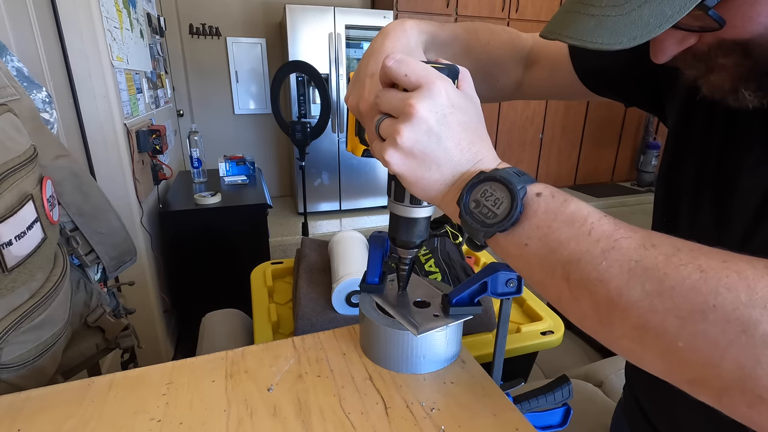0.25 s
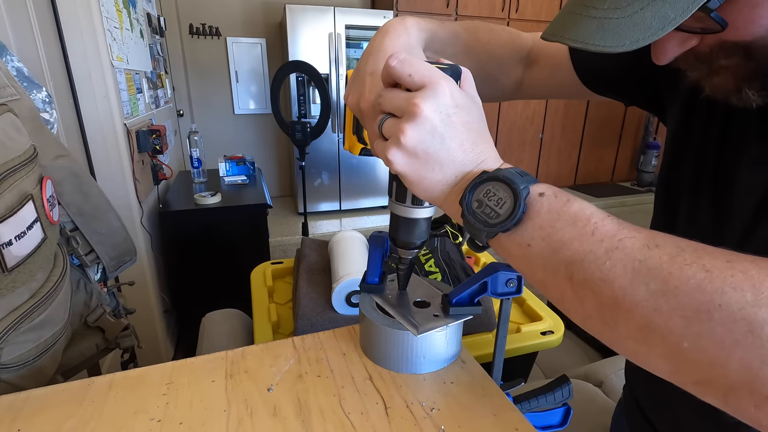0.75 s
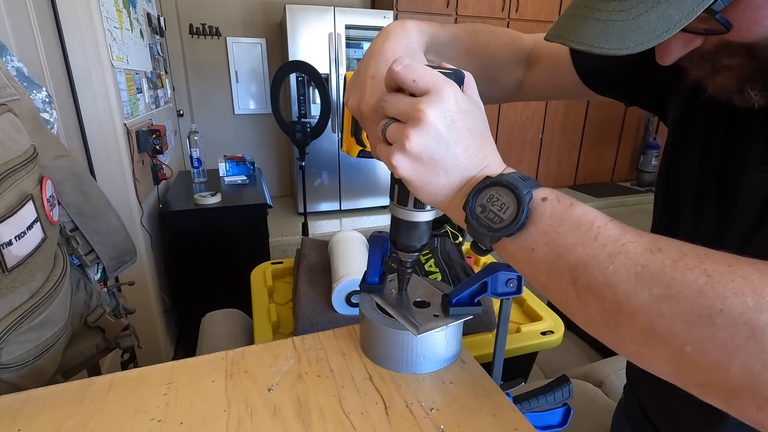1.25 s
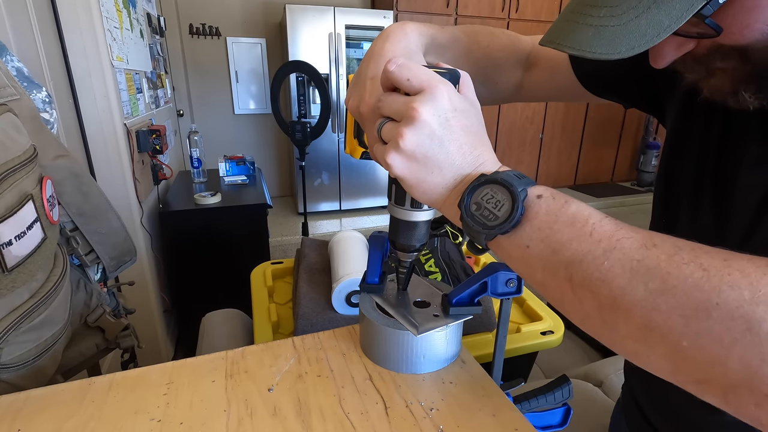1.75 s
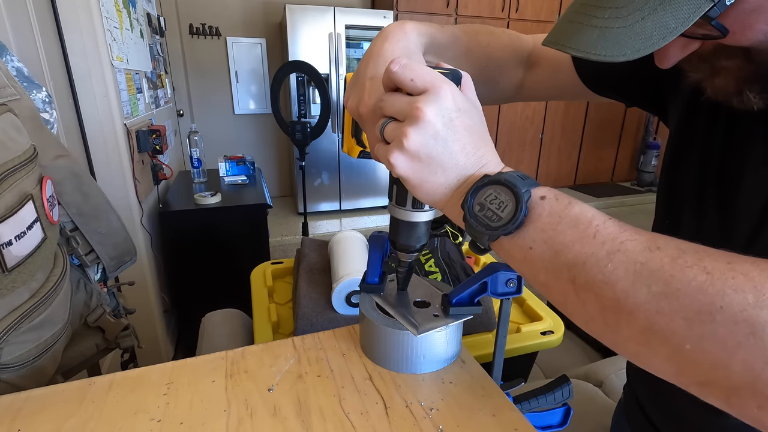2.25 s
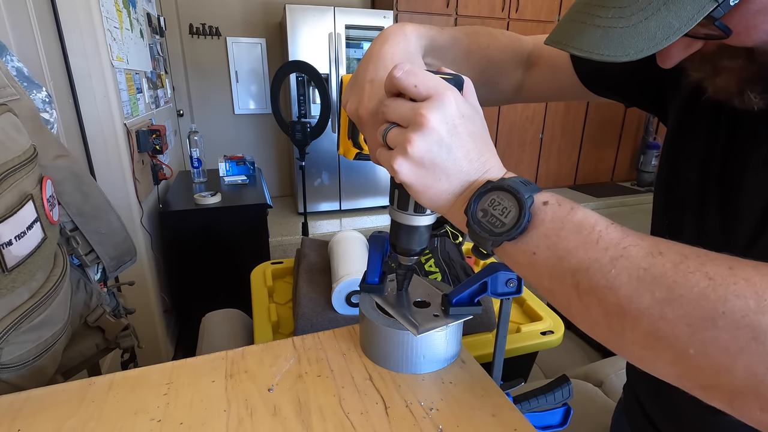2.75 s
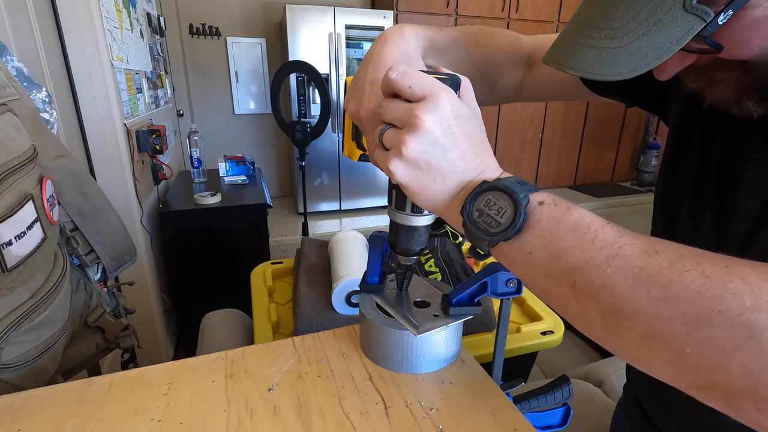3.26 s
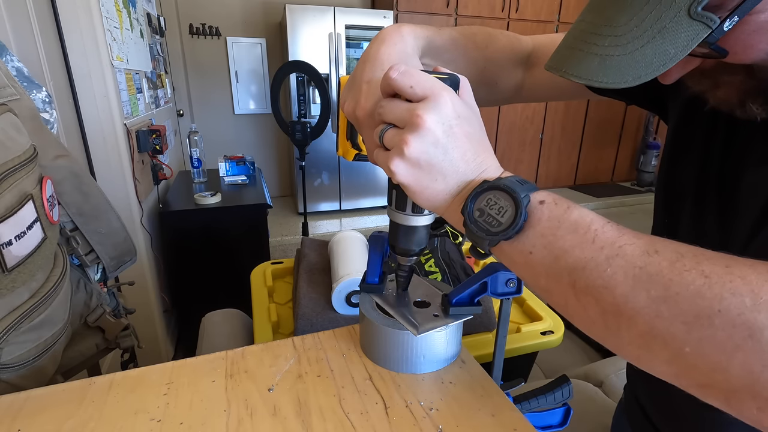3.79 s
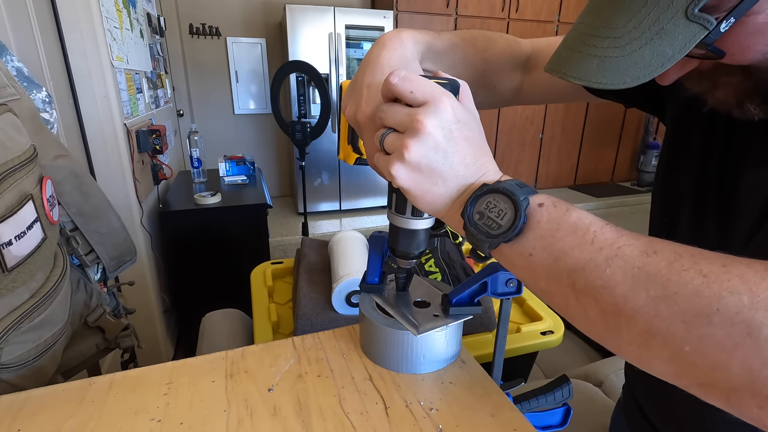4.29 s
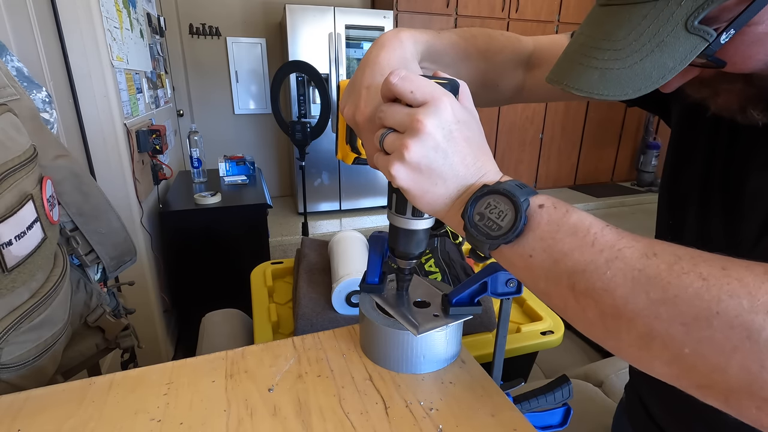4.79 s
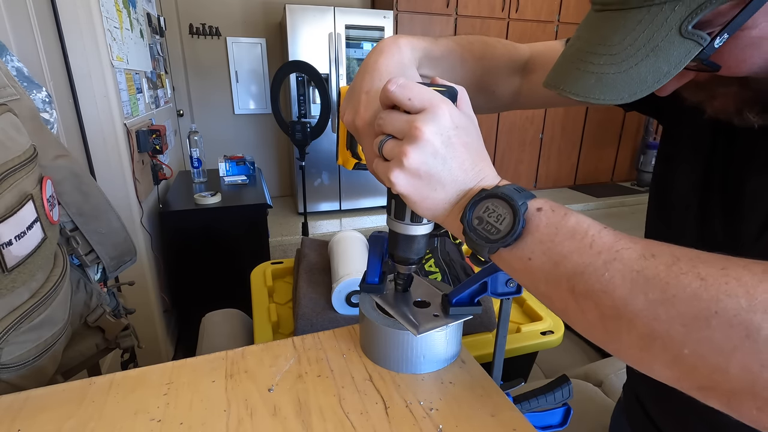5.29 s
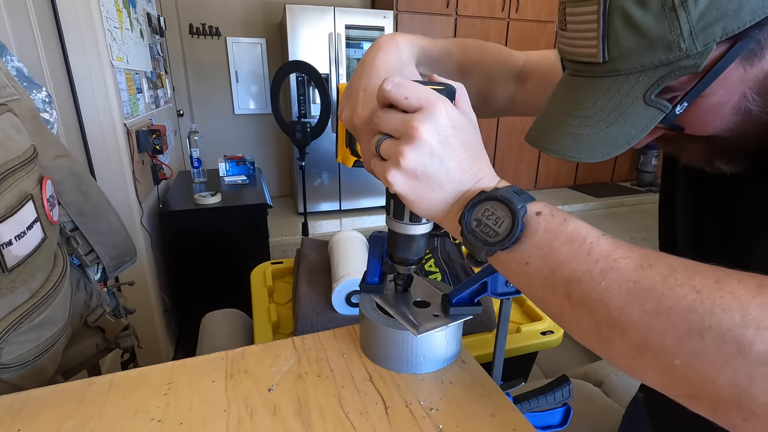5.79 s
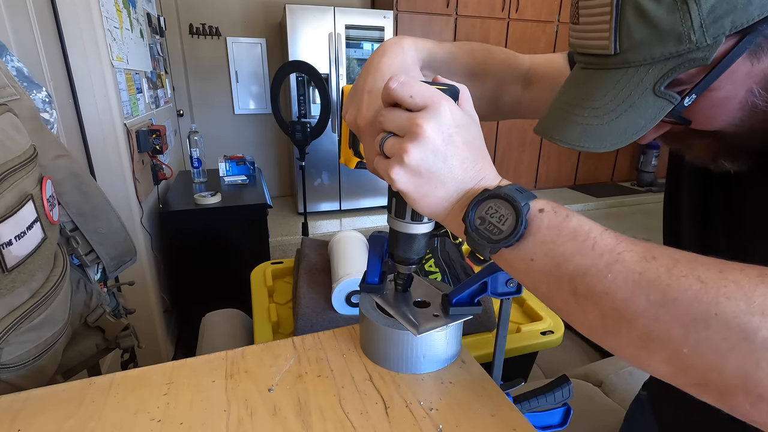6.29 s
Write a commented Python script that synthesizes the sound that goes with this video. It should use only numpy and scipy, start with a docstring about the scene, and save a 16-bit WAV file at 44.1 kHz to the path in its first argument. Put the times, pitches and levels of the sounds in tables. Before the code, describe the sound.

Close up in a workshop, a cordless drill bores a clamped steel plate in six bursts. The first is already under way and stops almost at once; four more follow, each juddering up from slow chatter to a rasping growl with hiss, small squeaks and sharp metal snaps. Each cuts off quickly, leaving a short room ring, faint ticks and a low motor hum. The last is still running at the end.

```python
"""A cordless drill pushes a step bit through a clamped steel plate in six bursts, close by in a workshop.
Stick-slip chatter that quickens with speed drives three layers: bench rumble, plate rasp and scraping hiss.
Sine chirps make the squeaks; dying noise cracks make the catches and ticks. The first burst is already
under way and the last still runs at the end; between them the room rings out over a humming appliance."""
import sys
import numpy as np
from scipy import signal
from scipy.fft import rfft, irfft, next_fast_len
from scipy.io import wavfile
from scipy.ndimage import uniform_filter1d

SR = 44100
rng = np.random.default_rng(int(sys.argv[2]) if len(sys.argv) > 2 else 0)


def int16_out(signal):
    """Quantize to a 16-bit WAV file."""
    q = np.round(np.clip(np.atleast_2d(signal).T, -1, 1) * 32767)
    wavfile.write(sys.argv[1], SR, q.astype(np.int16))


N = 288414
T = np.arange(N) / SR

# pulls of the trigger; the touch level is added to the three layers until the edge has sunk in:
# (on [s], off [s], creep before the squeeze [s], spin-up [s], top rate [slips/s], time to sink in [s],
#  first touch [dB], bench [dB], plate [dB], scrape [dB])
TRIGGER_PULLS = [(-.3, 0.147, 0, 0.11, 362, .05, -20, -22, -20, -27),
                 (.65, 1.493, .105, .25, 383, 0.16, -21.5, -21, -20, -27.5),
                 (2.037, 2.969, 0.0002, .29, 319, .065, -20.5, -22.5, -20.5, -27.5),
                 (3.561, 4.213, .015, .27, 355, 0.082, -34, -23, -20, -27),
                 (4.768, 5.233, 0.0026, .115, 380, 0.049, -11, -23.5, -20, -26),
                 (6.475, 6.67, 0.024, 0.39, 276, 0.071, -22.5, -21, -22, -32.5)]
# rate of the barely turning bit [slips/s]; slowing time constant once the trigger is let go [s]
CREEP_SLIPS_PER_S, BRAKE_S = 45, .03
# the bit stops biting and skates on the steel: (time [s], half length [s], depth [0-1])
SKATES = [(1.282, 0.056, .6), (2.732, 0.14, .85), (3.978, .075, 1.0), (5.024, 0.058, 0.74)]
SKATE_DRAG = .14  # share of the speed lost to rubbing at depth 1
# change of the three layers at skate depth 1 [dB]
SKATE_BENCH_DB, SKATE_PLATE_DB, SKATE_SCRAPE_DB = -7, -3.5, 0.5
# the bench shakes hardest at this chatter rate [slips/s], over this spread [octaves], with this lift [dB]
SHAKE_HZ, SHAKE_OCTAVES, SHAKE_DB = 135, 0.52, 4
SWING_DB = 4.5  # extra lift of the low swing while the bench shakes hardest
# the scrape grows with speed, with no change at this rate
FULL_SLIPS_PER_S, SCRAPE_DB_PER_OCTAVE = 400, 0.6
# spells in which the edges dig in evenly as the bit turns:
# (first bite [s], last bite [s], rate [bites/s], depth [dB])
THROBS = [(0.95, 1.107, 33, 5), (1.164, 1.3, 15.7, 1), (1.329, 1.5, 41.2, 6), (2.156, 2.297, 22.2, 3),
          (2.316, 2.486, 29.4, 5.5), (2.518, 2.765, 33, 6), (3.689, 3.945, 24.4, 3),
          (4.012, 4.2, 36.8, 3.5), (4.839, 5.02, 17.3, 3), (5.058, 5.22, 18, 3)]
# overtones of the slip rate: (multiple of the rate [1], relative level [dB])
GROWL_OVERTONES = [(2, -4), (3, -3), (4, -5.5)]

# an edge catches and snaps a chip: (time [s], relative strength [dB])
CATCHES = [(0.6544, -30.5), (0.6943, -18.5), (0.7312, -16.5), (0.7664, -11), (0.8364, -14.5),
           (1.0066, -7.5), (2.0562, -26.5), (2.0744, -8), (2.3174, -14.5), (2.8734, 1.5), (3.6012, -22),
           (3.6267, -7), (4.7935, -3), (4.8105, -5), (4.8774, -11), (5.2694, -18), (6.4837, -29.5),
           (6.5054, -31), (6.5304, -28)]
# loose chips and the slack chuck tick: (time [s], relative strength [dB])
TICKS = [(3.2964, -45.5), (3.4481, -55), (4.7503, -41), (5.4378, -36.5), (5.5485, -36), (5.6284, -50.5),
         (5.7224, -48.5), (6.3654, -58)]
# the dry edge squeaks on the steel: (time [s], length [s], pitch [Hz], relative level [dB])
SQUEAKS = [(1.212, 0.0084, 5460, -20), (1.232, 0.011, 5330, -28.5), (1.297, .008, 6100, -26.5),
           (1.323, 0.01, 5500, -19), (2.599, 0.0036, 5028, -16), (2.663, 0.013, 6640, -23),
           (2.716, 0.0087, 6220, -18.5), (2.747, .020, 5970, -21), (2.77, 0.012, 7950, -20),
           (2.787, 0.013, 7660, -21.5), (2.811, 0.013, 6690, -22.5), (3.926, 0.0075, 5330, -18.5),
           (3.95, 0.012, 6950, -14.5), (3.981, 0.012, 7000, -17.5), (4.017, 0.011, 5970, -16),
           (4.81, 0.0074, 5760, -30.5), (1.268, 0.052, 3450, -31.5), (1.381, 0.033, 4140, -26.5),
           (2.585, 0.04, 3500, -29), (2.655, 0.031, 3892, -28.5), (2.73, 0.014, 3700, -34),
           (2.917, 0.056, 3990, -27), (4.094, 0.044, 3604, -29), (5.209, 0.016, 4705, -27.5)]

# resonances of the bench: (frequency [Hz], width [Hz], lift [dB])
BENCH_MODES = [(171.5, 18, 11), (367.8, 24, 1)]
# resonances of the clamped plate: (frequency [Hz], width [Hz], lift [dB])
PLATE_MODES = [(588.6, 63, 6.6), (695, 30, 2.33), (746.5, 25, 12.6), (819, 20, 5), (910, 48, 3.3),
               (969, 52, 1), (1115, 25, 1.2), (2085, 41, 6), (2230, 35, 2.1), (3000, 160, 8.4)]
# resonances of the bit: (frequency [Hz], width [Hz], lift [dB])
BIT_MODES = [(3550, 110, 2.9), (3880, 81, 3), (4660, 290, 6.9), (6400, 56, 1.4), (6850, 130, 3.6),
             (10190, 900, 10.2)]
# broad colour of the bench rumble: (frequency [Hz], gain [dB])
BENCH_COLOUR = [(35, -21), (70, -2), (125, 0.5), (200, -2.5), (330, -4.5), (420, -4), (520, -9), (700, -52)]
# broad colour of the plate rasp: (frequency [Hz], gain [dB])
PLATE_COLOUR = [(300, -26), (500, -12), (620, -1.5), (900, 1.5), (1050, -1), (1250, -4), (1700, -4),
                (2300, -6), (2700, -13), (3600, -39)]
# broad colour of the scraping hiss: (frequency [Hz], gain [dB])
SCRAPE_COLOUR = [(2000, -31), (2800, 4.5), (3250, -2), (3600, 2), (5200, -2.5), (7500, -7), (8600, -15),
                 (10500, -12.5), (12000, -17), (14100, -19.5), (14800, -42.5)]
# broad colour of a tick: (frequency [Hz], gain [dB])
TICK_COLOUR = [(200, -20.5), (900, 2), (3000, 0), (7000, -3), (14000, -15.5)]

# decay of the workshop's tail: (frequency [Hz], t60 [s])
ROOM_DECAY = [(100, 0.93), (400, 0.49), (1500, 0.67), (4000, 0.36), (8000, 0.36), (14000, 0.16)]
# the strongest rings carry less into the centre of the tail: (frequency [Hz], width [Hz], lift [dB])
ROOM_DIPS = [(750, 140, -5.5), (2100, 87, -1), (4646, 440, -6)]
# gain on the side signal, for echoes and air: (frequency [Hz], gain [dB])
SIDE_COLOUR = [(30, -22), (80, -29.5), (200, -16), (700, -13.5), (1400, -8), (3000, -9.5), (9000, -11.5),
               (13000, -5)]
# partials of the appliance: (frequency [Hz], level before swell and waver [dB rms])
HUM_PARTIALS = [(118.4, -41), (236.9, -57.5), (425.3, -79.5), (1066, -84), (1244, -77), (1362, -77),
                (1480, -79), (1599, -84.5)]
# swell of the whole hum: (time [s], lift [dB])
HUM_SWELL = [(0, 2), (3.3, 3.5), (5.5, 1.5), (5.85, 4.5), (6.15, 6.5), (6.5, 9.5)]
# colour of the low room rumble: (frequency [Hz], gain [dB])
AIR_COLOUR = [(8, -6.5), (22, 15), (42, -2.5), (70, 0.5), (120, -12), (180, -17), (320, -25.5), (830, -36),
              (1250, -32.5), (3000, -50), (6300, -61.5), (8500, -76), (14000, -83.5)]
AIR_DB = -36

CUTOFF_HZ = 15600


def from_db(db):
    """Decibels to gain."""
    return 10 ** (np.asarray(db) / 20)


def rms_one(x):
    """Scale to rms 1."""
    return x / np.sqrt(np.mean(x ** 2) + 1e-20)


def bell(u):
    """A smooth bump of height 1 around zero."""
    return np.exp(-np.minimum(u ** 2, 20))


def at_hz(points, hz):
    """Read a table on a log-frequency axis."""
    points = np.array(points)
    return np.interp(np.log(np.maximum(hz, 1)), np.log(points[:, 0]), points[:, 1])


def drift(rate):
    """Slow random wander of rms 1, drawn as lines between 2 * rate chance values per second."""
    knots = rng.standard_normal(int(N / SR * 2 * rate) + 2)
    return rms_one(np.interp(T * 2 * rate, np.arange(len(knots)), knots))


def colour(x, spectrum):
    """Give a sound a broad spectrum."""
    size = next_fast_len(N + SR // 2)
    hz = np.arange(size // 2 + 1) * SR / size
    return irfft(rfft(x, size) * from_db(at_hz(spectrum, hz)), size)[..., :N]


def resonate(x, modes):
    """Each mode lifts or dips a band; a narrow lifted one rings on."""
    for hz, width_hz, lift_db in modes:
        r = np.exp(-np.pi * width_hz / SR)
        zeros = np.array([1, 0, -1]) * (1 - r * r) / 2
        poles = [1, -2 * r * np.cos(2 * np.pi * hz / SR), r * r]
        x = x + (from_db(lift_db) - 1) * signal.lfilter(zeros, poles, x)
    return x


def even(x):
    """Hold the slow level at 1 and keep the fast grain."""
    power = uniform_filter1d(np.mean(x ** 2, axis=0), size=3000)
    return x / np.sqrt(power + 1e-12)


def cutting(jitter, slip_share, rub, knock_db, shudder_db, growl_db, uneven_db, full_cut_db):
    """The edges stick and slip; every slip knocks the plate and tears a puff of fractures from it."""
    rate, bench_db, plate_db, scrape_db = cut(hunt=.025)
    load = bites(width=0.17, restless_db=1.4)

    slips = np.cumsum(rate * (1 + jitter * drift(60))) / SR
    count = slips.astype(int)
    slip_sizes_db = uneven_db * np.clip(rng.standard_normal(count[-1] + 1), -2, 2)
    strength = from_db(slip_sizes_db)[count]
    # each slip is a dying puff over a steady rub
    tearing = rms_one(strength * np.exp(-(slips % 1) / slip_share) + rub)
    knocks = rms_one(np.diff(count, prepend=0) * strength)

    # slow slips swing the whole drill and bench; fast ones move it less
    swing_gain = from_db(2.0 * drift(25) + SWING_DB * shake(rate)) / np.sqrt(1 + (rate / 230) ** 3)
    swing = swing_gain * np.sin(2 * np.pi * slips)
    rumble = even(colour(tearing * grains(6000, spread_db=2.0, scatter_db=3.0), BENCH_COLOUR))
    bench = resonate(load * (rumble + from_db(shudder_db) * swing), BENCH_MODES)

    # overtones of the slips swell as they glide through the plate's resonances
    growl = np.zeros(N)
    for multiple, db in GROWL_OVERTONES:
        phase = 2 * np.pi * (multiple * slips + rng.random())
        growl += from_db(db + 2.2 * drift(13)) * np.sin(phase)
    torn = tearing * grains(8000, spread_db=2.0, scatter_db=1.0)
    rasp = even(colour(torn + from_db(knock_db) * knocks, PLATE_COLOUR))
    plate = resonate(load * (rasp + from_db(growl_db) * colour(growl, PLATE_COLOUR)), PLATE_MODES)

    hiss = colour(tearing * grains(18000, spread_db=0.0, scatter_db=2.0), SCRAPE_COLOUR)
    # a light cut only rubs, and lacks the top of the hiss
    depth = np.minimum(from_db(scrape_db - full_cut_db), 1)
    hiss = depth * hiss + (1 - depth) * colour(hiss, [(4500, 5.5), (9000, -11.5)])
    scrape = resonate(load * hiss, BIT_MODES)

    layers = from_db(bench_db) * even(bench)
    layers = layers + from_db(plate_db) * even(plate)
    layers = layers + from_db(scrape_db) * even(scrape)
    return layers * trigger(rise_s=0.0093, coast_s=.012)


def cut(hunt):
    """Speed shifts the levels of bench and scrape; skating slows the bit and alters all three layers."""
    rate, (bench_db, plate_db, scrape_db) = drive()
    skate = sum(depth * bell((T - s) / half_s) for s, half_s, depth in SKATES)
    rate = rate * (1 - SKATE_DRAG * skate) * (1 + hunt * drift(7))
    speed_db = SCRAPE_DB_PER_OCTAVE * np.log2(rate / FULL_SLIPS_PER_S)
    bench_db = bench_db + SKATE_BENCH_DB * skate + SHAKE_DB * shake(rate)
    plate_db = plate_db + SKATE_PLATE_DB * skate
    scrape_db = scrape_db + SKATE_SCRAPE_DB * skate + speed_db
    return rate, bench_db, plate_db, scrape_db


def drive():
    """The bit creeps, spins up and is braked while its edge sinks in: slips/s and layer levels in dB."""
    rate, levels = np.zeros(N), np.zeros((3, N))
    for on, off, creep_s, spin_s, top, sink_s, touch_db, *full_db in TRIGGER_PULLS:
        spin_up = np.tanh(np.maximum(T - on - creep_s, 0) / spin_s)
        speed = spin_up * np.exp(-np.maximum(T - off, 0) / BRAKE_S)
        shallow = np.cos(np.pi / 2 * np.clip((T - on) / sink_s, 0, 1)) ** 2
        rate = np.where(T >= on, CREEP_SLIPS_PER_S + (top - CREEP_SLIPS_PER_S) * speed, rate)
        levels = np.where(T >= on, np.array(full_db)[:, None] + touch_db * shallow, levels)
    return rate, levels


def shake(rate):
    """How near the chatter is to the rate that shakes the bench, 0-1."""
    return bell(np.log2(rate / SHAKE_HZ) / SHAKE_OCTAVES)


def bites(width, restless_db):
    """The load swells each time an edge digs in, for a share of the turn, and wavers throughout."""
    load_db = restless_db * drift(70)
    for first, last, per_s, depth_db in THROBS:
        turns = (T - first) * per_s
        during = (turns > -.5) & (T < last + .5 / per_s)
        from_bite = turns - np.round(turns)
        load_db = load_db + during * depth_db * (bell(from_bite / width) - .5)
    return from_db(load_db)


def grains(per_s, spread_db, scatter_db):
    """Tiny fractures at random moments, sizes spread by spread_db, each at its own place round the bit."""
    sizes = from_db(spread_db * np.minimum(rng.exponential(1, N), 3.3)) * rng.choice([-1, 1], N)
    places = from_db(scatter_db * np.clip(rng.standard_normal(N), -2, 2) * [[1], [-1]])
    return rms_one(sizes * places * (rng.random(N) < per_s / SR))


def trigger(rise_s, coast_s):
    """The cutting sound comes up quickly at each pull and dies quickly when the trigger is let go."""
    gate = np.zeros(N)
    for on, off, *_ in TRIGGER_PULLS:
        gate += np.clip((T - on) / rise_s, 0, 1) * np.exp(-np.maximum(T - off, 0) / coast_s)
    return gate


def squeaks(sag, arch, rasp, waver, octave_db):
    """A rubbing edge sings in a wavering, falling arch of pitch; the short squeaks are the roughest."""
    out, fast, slow = np.zeros(N), drift(900), drift(70)
    for s, length, hz, db in SQUEAKS:
        near = np.abs(T - s) < 2 * length
        u = (T[near] - s) / length
        roughness = min(1, .016 / length)
        bend = roughness * (rasp * fast[near] - sag * u) + waver * slow[near] - arch * u ** 2
        phase = 2 * np.pi * np.cumsum(hz * (1 + bend)) / SR
        tone = np.sin(phase) + from_db(octave_db) * np.sin(2 * phase)
        out[near] += from_db(db + 2) * np.exp(-(2 * u) ** 4) * tone
    return out


def clicks():
    """Hard catches ring plate and bit; loose chips and the slack chuck only tick."""
    crack = snaps(CATCHES, t60=0.02)
    plate = resonate(colour(crack, PLATE_COLOUR), PLATE_MODES)
    bit = resonate(colour(crack, SCRAPE_COLOUR), BIT_MODES)
    ticks = colour(snaps(TICKS, t60=0.037), TICK_COLOUR)
    return from_db(-3.5) * plate + from_db(-9.5) * bit + from_db(-7) * ticks


def snaps(events, t60):
    """A short dying noise crack for each event."""
    hits = np.zeros(N)
    for s, db in events:
        hits[min(int(s * SR), N - 1)] = from_db(db)
    envelope = signal.lfilter([1], [1, -from_db(-60 / (t60 * SR))], hits + 1e-18)
    return envelope * rng.standard_normal(N)


def workshop(x, early_db, early_t60, tail_db, side_tail_db):
    """The room's tail, plus quick echoes from bench and body that come from aside and give the width."""
    t, edges = T[:SR], np.geomspace(40, 16000, num=10)
    response = np.zeros((2, SR))
    # noise that dies away at its own pace in each band
    for low, high in zip(edges, edges[1:]):
        band_filter = signal.butter(2, [low, high], "band", fs=SR, output="sos")
        band = signal.sosfilt(band_filter, rng.standard_normal((2, SR)))
        response += band * from_db(-60 * t / at_hz(ROOM_DECAY, np.sqrt(low * high)))
    tail = rms_one(response * (t > .008)) / np.sqrt(SR)
    early_noise = rng.standard_normal(SR) * from_db(-60 * t / early_t60)
    early = rms_one(early_noise * (t > .002)) / np.sqrt(SR)

    source = x.mean(axis=0)
    mid = signal.fftconvolve(resonate(source, ROOM_DIPS), from_db(tail_db) * tail[0])[:N]
    side_response = from_db(early_db) * early + from_db(side_tail_db) * tail[1]
    side = colour(signal.fftconvolve(source, side_response)[:N], SIDE_COLOUR)
    return x + mid + side * [[1], [-1]]


def background():
    """A motor hums with slightly wavering overtones over the low rumble of the room."""
    swell_db = np.interp(T, *np.transpose(HUM_SWELL))
    wander = np.cumsum(1 + 0.0004 * drift(5.7)) / SR
    hum = np.zeros(N)
    for hz, db in HUM_PARTIALS:
        level = from_db(db + .25 * drift(3.3)) * np.sqrt(2)  # rms to peak
        hum += level * np.sin(2 * np.pi * (hz * wander + rng.random()))
    mid, side = rms_one(colour(rng.standard_normal((2, N)), AIR_COLOUR))
    air = mid + colour(side, SIDE_COLOUR) * [[1], [-1]]
    # the hum leans slightly to the left
    return hum * from_db(swell_db) * from_db([[.4], [-.4]]) + from_db(AIR_DB) * air


def scene():
    """The drill in the room, over the hum."""
    drill = cutting(jitter=.02, slip_share=0.28, rub=0.52, knock_db=-12.5, shudder_db=2,
                    growl_db=-8.5, uneven_db=1.47, full_cut_db=-27.5)
    drill = drill + squeaks(sag=0.0426, arch=0.17, rasp=.05, waver=0.012, octave_db=-16.5)
    drill = drill + clicks()
    return workshop(drill, early_db=-0.5, early_t60=.06, tail_db=-15, side_tail_db=-12) + background()


def record(dry):
    """The highest peaks are rounded and the top is cut steeply."""
    rounded = dry / (1 + (dry / .75) ** 4) ** .25
    steep_cut = signal.cheby2(14, 70, CUTOFF_HZ, fs=SR, output="sos")
    return signal.sosfilt(steep_cut, rounded)


dry = scene()
out = record(dry)
int16_out(out)
```